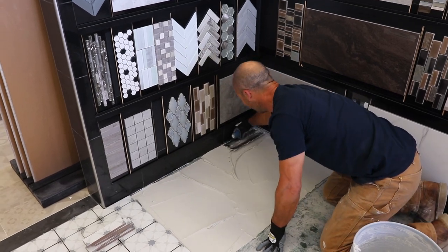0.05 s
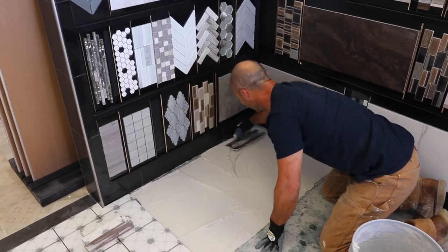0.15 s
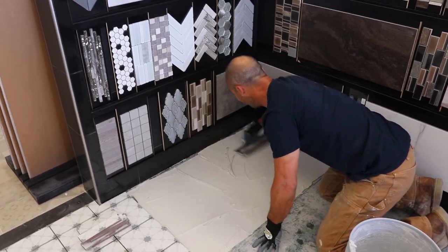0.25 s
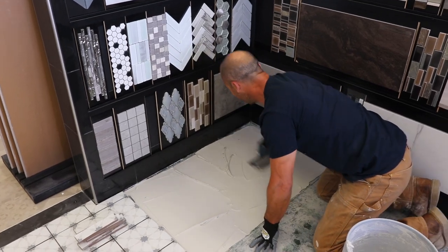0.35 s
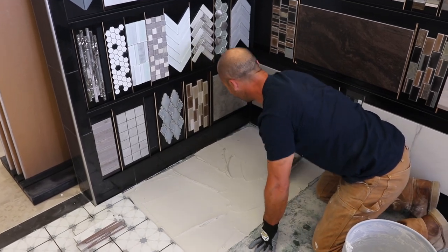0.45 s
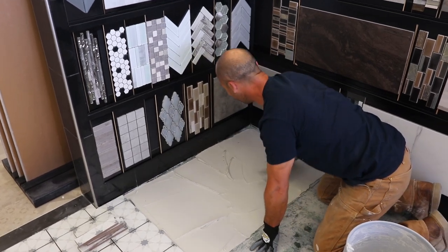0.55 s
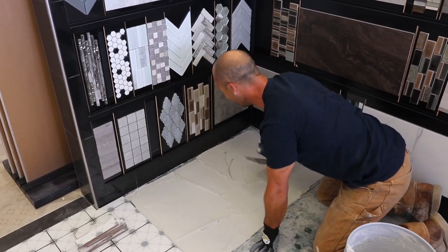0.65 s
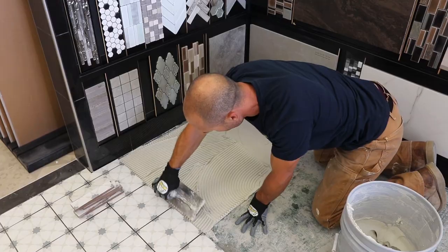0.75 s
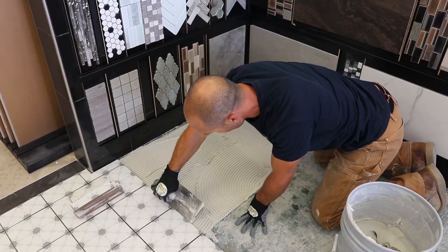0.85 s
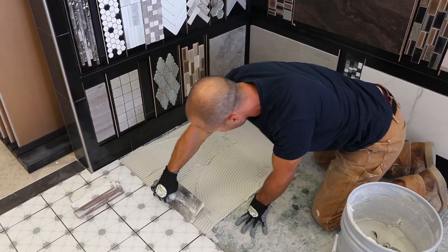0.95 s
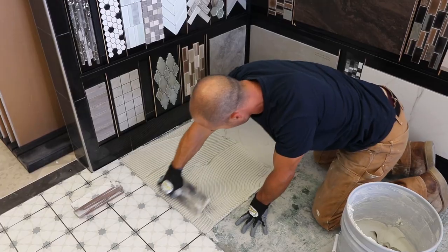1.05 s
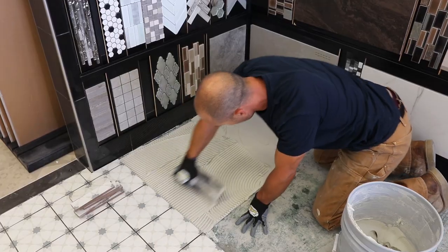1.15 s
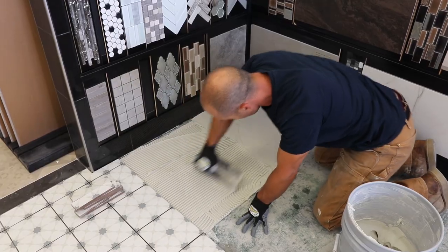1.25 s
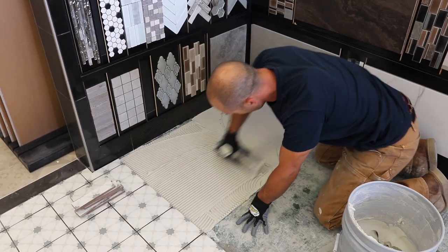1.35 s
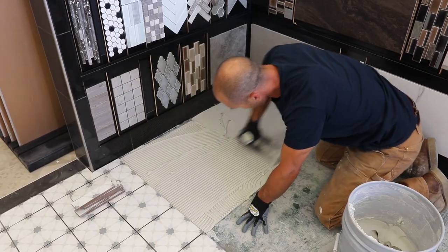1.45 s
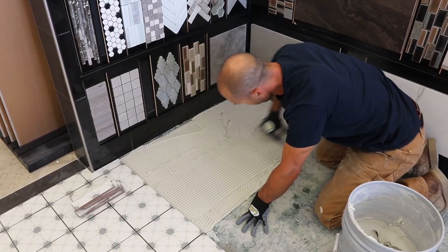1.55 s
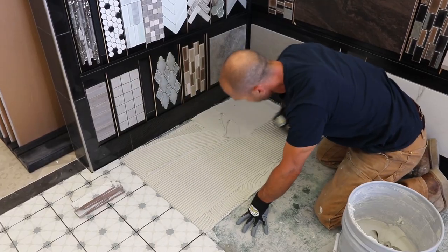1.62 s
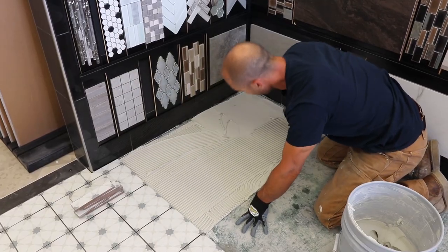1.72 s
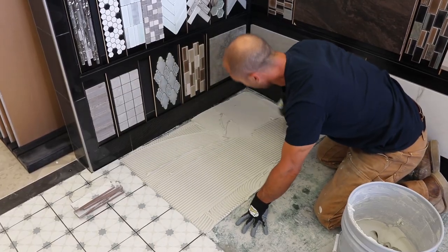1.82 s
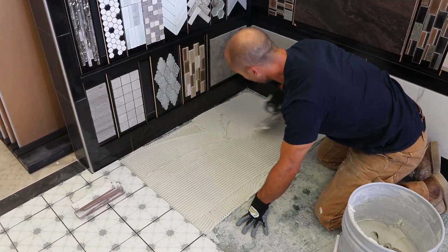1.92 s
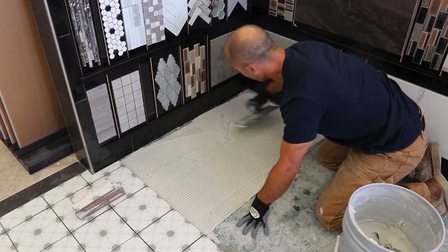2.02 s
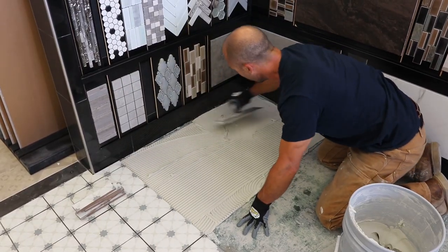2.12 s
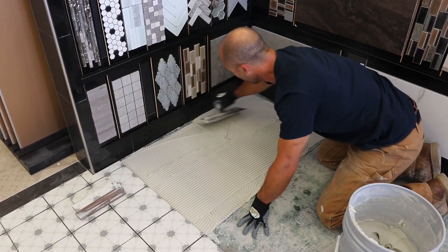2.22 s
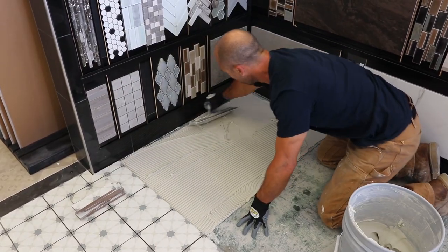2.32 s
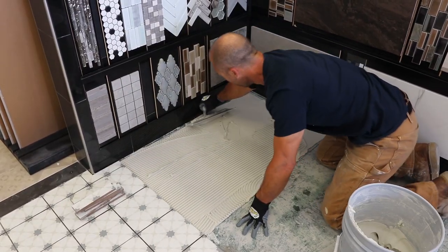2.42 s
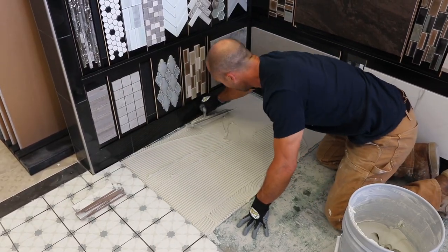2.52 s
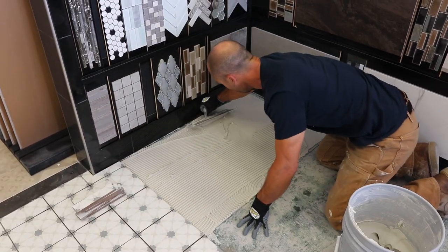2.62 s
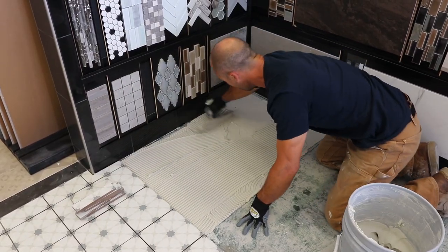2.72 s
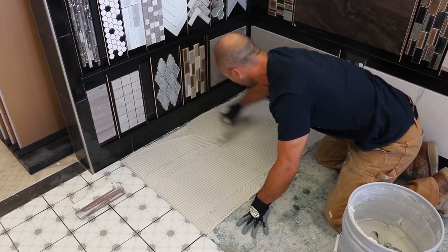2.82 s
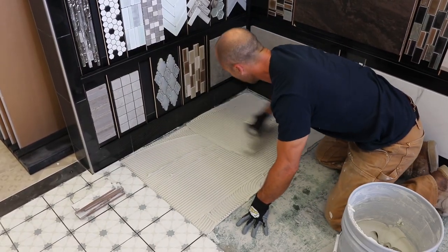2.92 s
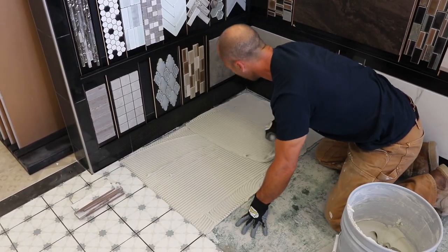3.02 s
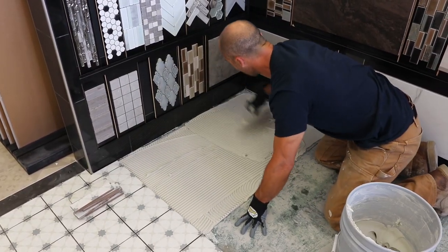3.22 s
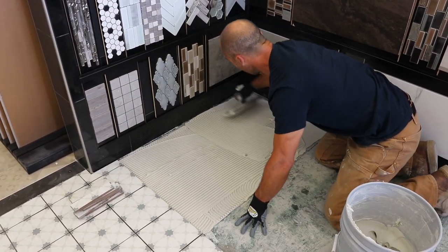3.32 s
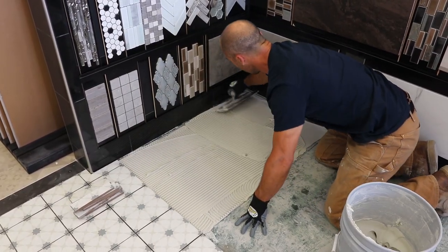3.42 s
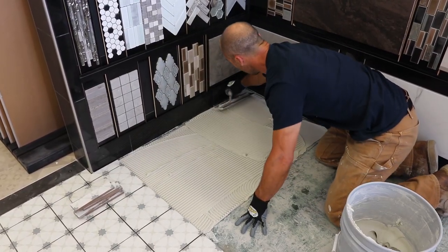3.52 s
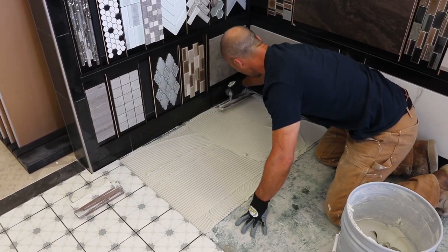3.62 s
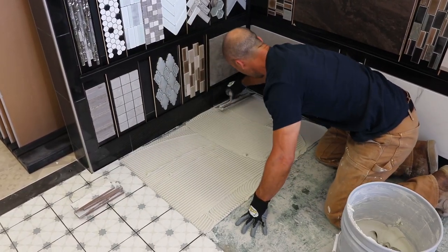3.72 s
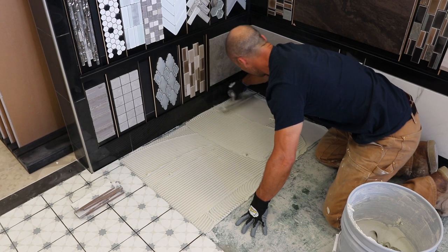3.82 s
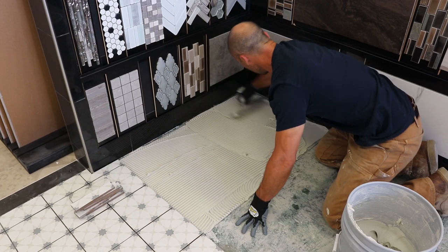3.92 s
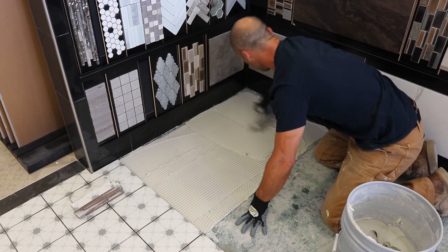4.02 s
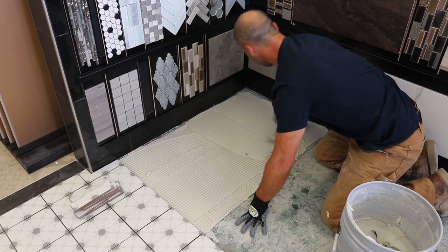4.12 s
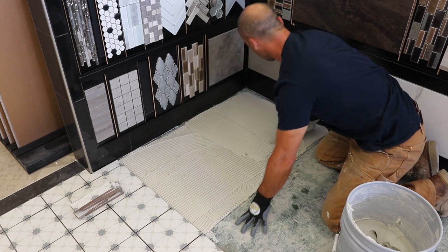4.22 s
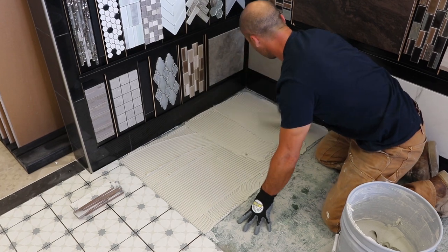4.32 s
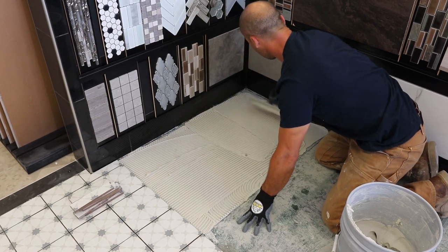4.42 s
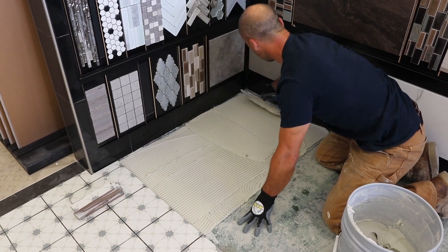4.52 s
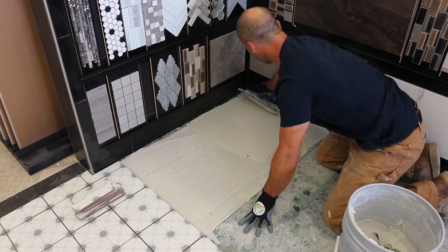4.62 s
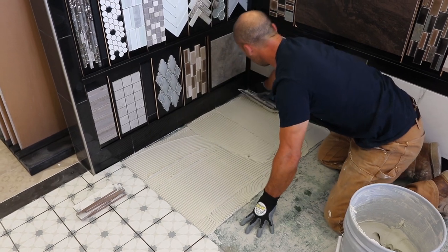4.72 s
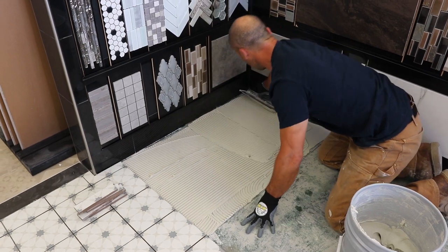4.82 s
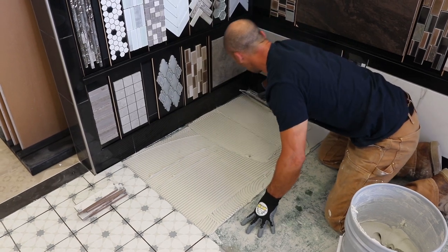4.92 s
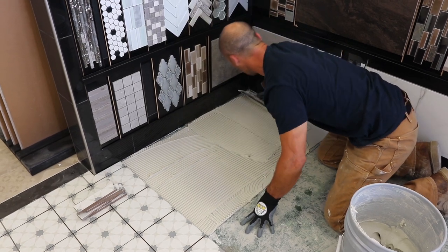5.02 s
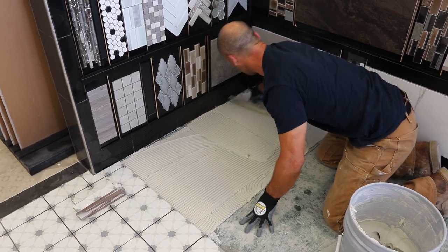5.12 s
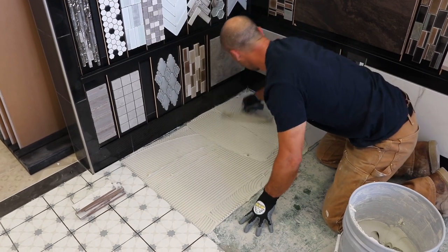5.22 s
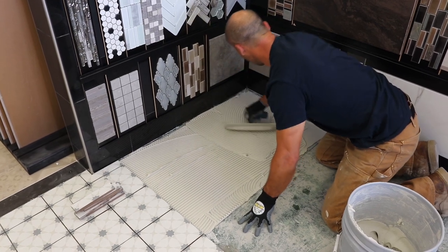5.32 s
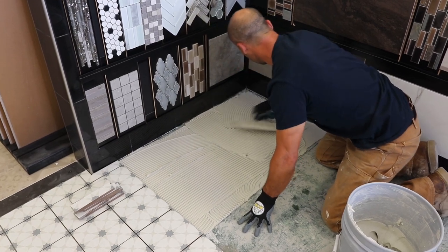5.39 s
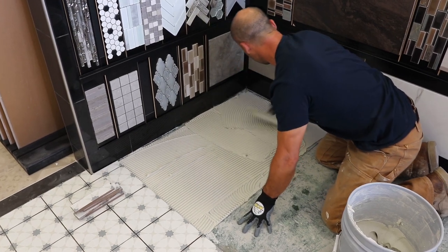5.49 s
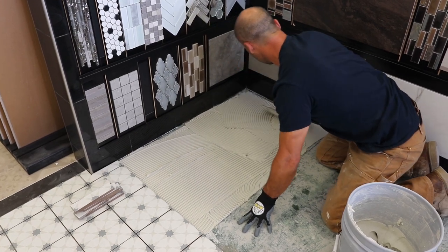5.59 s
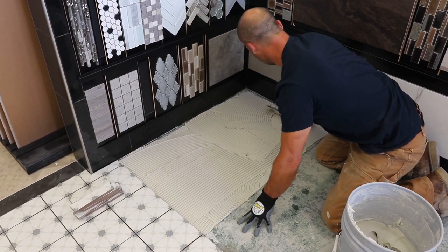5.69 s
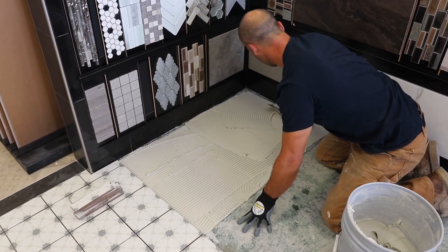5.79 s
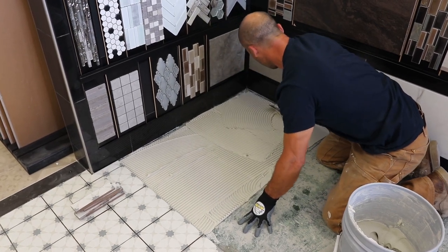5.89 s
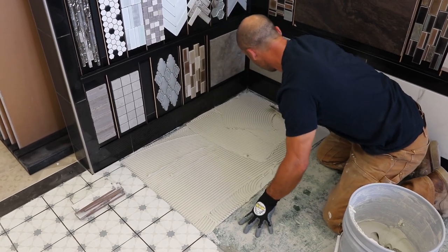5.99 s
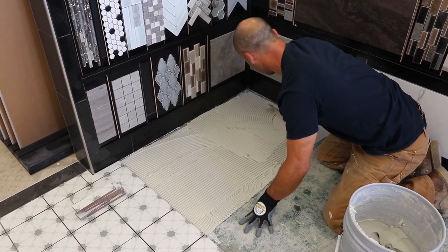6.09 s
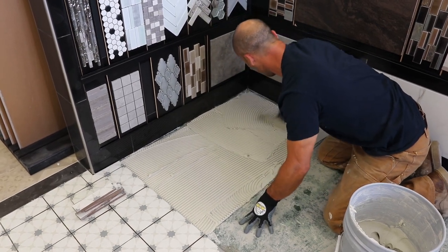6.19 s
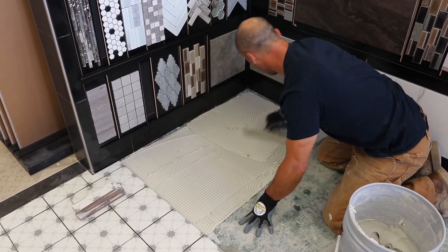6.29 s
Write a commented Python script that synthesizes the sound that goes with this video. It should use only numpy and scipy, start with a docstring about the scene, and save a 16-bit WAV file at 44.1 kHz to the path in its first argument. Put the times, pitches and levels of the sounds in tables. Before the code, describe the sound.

Close gritty scraping of a steel trowel through sandy mortar on a hard floor. A few light scuffs and a sharp knock come first, then three rapid linked strokes, a knock and thud, a pause, and more strokes in pairs, getting shorter and softer. Faint ventilation and hiss in a furnished showroom with a short tail; one microphone, centred.

```python
"""Trowel combing mortar on a floor

A steel notched trowel combs gritty mortar over a hard floor in a furnished showroom, heard by one microphone.
Sand grains are random clicks that shake the blade: its resonances ring in strokes; the light first touch and
rustles of clothing and knee sound plainer. The edge ticks as it lands (short noise bursts); knee and hand thud
on the floor (low rings that fade). A room tail, ventilation, a low rumble and hiss lie around the work."""
import sys
import numpy as np
from scipy import signal
from scipy.fft import rfft, irfft
from scipy.io import wavfile
from scipy.ndimage import uniform_filter1d

SR = 44100
rng = np.random.default_rng(int(sys.argv[2]) if len(sys.argv) > 2 else 0)


def unload_wav(signal):
    """Save mono or channel-first audio to the path in sys.argv[1] as 16-bit WAV at rate SR, clipped to [-1, 1]."""
    wavfile.write(
        sys.argv[1],
        SR,
        np.round(np.clip(np.atleast_2d(signal).T, -1, 1) * 32767).astype(np.int16),
    )


N = 280035


def amp(db):
    """Turn decibels into a gain."""
    return 10 ** (np.asarray(db) / 20)


def rms_one(x):
    """Scale a sound to an average strength (rms) of 1."""
    return x / np.sqrt(np.mean(x ** 2) + 1e-20)


def at_hz(points, hz):
    """Read a table between its points, on a log-frequency axis."""
    table_hz, values = np.transpose(points)
    return np.interp(np.log(hz), np.log(table_hz), values)


def band(x, low_hz, high_hz):
    """Keep only the sound between two frequencies (Butterworth band-pass)."""
    sos = signal.butter(3, [low_hz, high_hz], "band", fs=SR, output="sos")
    return signal.sosfilt(sos, x)


def colour(x, spectrum):
    """Filter a sound to the given spectrum, with no sound ahead of its cause (minimum phase)."""
    size = 8192
    hz = np.arange(1, size // 2 + 2) * SR / size
    cepstrum = irfft(np.log(amp(at_hz(spectrum, hz))))
    # folding the second half onto the first makes the filter minimum-phase
    cepstrum[1:size // 2] *= 2
    cepstrum[size // 2 + 1:] = 0
    response = irfft(np.exp(rfft(cepstrum)))
    return signal.fftconvolve(x, response)[:N]


def drift(rate):
    """Slow random wandering, rms 1, drawn at every 20th sample; a higher rate wanders faster."""
    r = np.exp(-40 * np.pi * rate / SR)
    noise = rng.standard_normal(N // 20 + 2002)
    slow = signal.lfilter([1], [1, -2 * r, r * r], noise)[2000:]   # skip the filter's start
    return np.interp(np.arange(N) / 20, np.arange(len(slow)), rms_one(slow))


def resonance(x, hz, width_hz):
    """Something that rings at one pitch when shaken: a two-pole resonance with gain 1 at its top."""
    r = np.exp(-np.pi * width_hz / SR)
    top = (1 - r * r) / 2
    return signal.lfilter([top, 0, -top], [1, -2 * r * np.cos(2 * np.pi * hz / SR), r * r], x)


# colour of the ventilation and microphone hiss: (frequency [Hz], level [dB per Hz])
AIR_COLOUR = [(15, -30.5), (25, -13.5), (59, 1.5), (270, -2), (354, -2), (489, -7.5), (607, -1.5),
              (1040, -8.5), (1610, -8.5), (14800, -12.5), (16000, -11.5)]
AIR_DB = -63.5
# a low rumble that dies away: (time [s], level [dB])
RUMBLE_LEVEL = [(0.0, -67.5), (0.49, -74.5), (0.8, -82), (6.35, -81)]


def background():
    """Ventilation and microphone hiss are coloured noise; the rumble is noise around 14 to 55 Hz."""
    air = amp(AIR_DB) * rms_one(colour(rng.standard_normal(N), AIR_COLOUR))
    s, db = np.transpose(RUMBLE_LEVEL)
    rumble_gain = amp(np.interp(np.arange(N) / SR, s, db))
    rumble = rumble_gain * rms_one(band(rng.standard_normal(N), 14, 55))
    return air + rumble


# how long the room takes to fade by 60 dB: (frequency [Hz], time [s])
ROOM_FADE = [(150, 0.37), (400, 0.47), (1500, 0.37), (4000, 0.37), (12000, 0.15)]
# colour of the room tail: (frequency [Hz], level [dB])
ROOM_COLOUR = [(100, 3), (330, 5.5), (700, -2.5), (3000, -0.5), (12000, -5.5)]


def room(x):
    """Many scattered echoes blur into a tail: noise that rises over a few ms, then dies band by band."""
    t, tail = np.arange(SR) / SR, 0
    edges = 40 * 2 ** np.arange(0, 9, .5)   # half-octave bands
    for low, high in zip(edges, np.append(edges[1:], 19000)):
        fade_s = at_hz(ROOM_FADE, np.sqrt(low * high))
        level_db = at_hz(ROOM_COLOUR, low) - 60 * t / fade_s
        tail = tail + band(rng.standard_normal(SR), low, high) * amp(level_db)
    tail *= 1 - np.exp(-t / 0.002)
    return signal.fftconvolve(x, tail / np.sqrt(np.sum(tail ** 2)))[:N]


# knee and hand on the floor: (time [s], level [dB], pitch [Hz], time to fade by 60 dB [s])
KNEE_AND_HAND = [(1.832, -22, 184.5, 0.085), (2.51, -28, 75.2, 0.15), (3.595, -38, 286, 0.041),
                 (3.612, -44, 125, 0.077), (4.879, -54, 116, 0.12), (6.129, -38, 133, 0.087)]


def thuds():
    """A soft push on the floor: a ring that sags in pitch, a lower partner and a rounded start."""
    out, t = np.zeros(N + SR), np.arange(SR // 2) / SR
    for s, db, hz, t60 in KNEE_AND_HAND:
        turns = hz * (t + 0.00079 * (1 - np.exp(-t / 0.0051)))   # starts sharp, settles at hz
        ring = np.sin(2 * np.pi * turns) + .5 * np.sin(2 * np.pi * 0.69 * turns)
        start = (1 - np.exp(-t * hz * 3.1)) ** 2
        out[round(s * SR):][:len(t)] += amp(db - 60 * t / t60) * start * ring
    return band(out[:N], 45, 900)


# blade edge on the floor, plus one faint rustle of clothing at 3.7 s: (time [s], knock peak [dB], scratch peak
# above the knock [dB], knock pitch [Hz])
EDGE_TICKS = [(0.308, -42, -12.5, 613), (0.325, -43.5, 1, 635), (0.441, -34, -12, 950),
              (0.48, -20.5, -37, 1410), (1.015, -43, -4, 900), (1.55, -17, -21.5, 640),
              (1.815, -24, -10, 674), (2.554, -44, -17, 810), (2.601, -37.5, -34, 818),
              (2.655, -41.5, -8, 840), (3.7, -58.5, 9, 604), (3.777, -50, 9.5, 860),
              (3.801, -37.5, 12.5, 794), (3.877, -25, 0, 535), (4.904, -39.5, -20, 516),
              (4.943, -48.5, 0.5, 547), (4.992, -43, 4, 684), (5.005, -47, 13, 1160), (5.03, -42.5, 8, 860),
              (5.058, -49, 10, 980), (5.087, -34.5, 14.5, 1080), (5.305, -39.5, 4, 862),
              (5.948, -50, 4.5, 448), (6.005, -58, 10.5, 800), (6.081, -28.5, -10, 880),
              (6.099, -29.5, 8, 930), (6.135, -31, -4, 640)]
# bright part of a tick: (frequency [Hz], level [dB per Hz])
SCRATCH_COLOUR = [(1500, -39), (3000, -2), (4500, 2.5), (6300, 0), (9000, -10.5), (13000, -4),
                  (16000, -12.5)]
TICK_S = .0032   # fade time constant


def ticks():
    """Each landing of the edge, and the faint rustle at 3.7 s, is a noise burst: a damped knock at its own
    pitch and a bright scratch."""
    out, t = np.zeros(N + SR), np.arange(SR // 20) / SR
    knocks = rng.standard_normal((len(EDGE_TICKS), len(t)))
    scratch = colour(rng.standard_normal(N), SCRATCH_COLOUR)
    fade = np.exp(-t / TICK_S) * (1 - np.exp(-4 * t / TICK_S))
    for k, (s, db, scratch_db, hz) in enumerate(EDGE_TICKS):
        dull = resonance(resonance(knocks[k] * fade, hz, 0.17 * hz), hz, 1.3 * hz)
        bright = scratch[k * len(t):][:len(t)] * fade
        tick = dull / np.abs(dull).max() + amp(scratch_db) * bright / np.abs(bright).max()
        out[round(s * SR):][:len(t)] += amp(db) * tick
    return out[:N]


GRAINS_PER_S = 7000   # under a full press
GRAIN_SPREAD_DB, JUDDER_DB = 1, 0.5
FULL_PRESS_DB = -35   # below this level fewer grains catch


def grains(tables):
    """Sand grains catch as clicks of uneven size, sparse under a light touch; the contact sticks and slips."""
    s, press_db = np.vstack(tables)[:, :2].T
    share = np.clip(amp(np.interp(np.arange(N) / SR, s, press_db) - FULL_PRESS_DB), .3, 1)
    sizes = amp(GRAIN_SPREAD_DB * np.minimum(rng.exponential(1, N), 5))
    clicks = sizes * rng.choice([-1, 1], N) / np.sqrt(share)   # fewer clicks are made larger
    caught = rng.random(N) < share * GRAINS_PER_S / SR
    judder = amp(JUDDER_DB * (drift(34) + drift(150)))
    return clicks * caught * judder


# blade resonances: (pitch [Hz], width [Hz], level before the shared trim and flexing [dB])
BLADE_RINGS = [(367, 73, -4.5), (510, 76, -1.5), (640, 170, -1), (857, 77, 1), (1070, 420, -3.5),
               (1240, 81, -9.5), (1413, 210, -3), (1684, 140, -0.5), (1885, 260, -2), (3220, 440, -13.5),
               (4330, 1100, -7), (6140, 880, -5), (7700, 270, -8)]
# colour of the scrape: (frequency [Hz], level [dB per Hz])
SCRAPE_COLOUR = [(80, -59), (170, -14.5), (380, -14), (600, -5.5), (1100, -10), (1750, -6), (2350, -14),
                 (4200, -9), (7500, -14), (10500, -15.5), (13000, -11), (15700, -18)]
BLADE_RING_DB, FLEX_DB = -0.5, 6   # shared trim, rms swing of the flexing


def blade(x):
    """The steel plate adds its rings to whatever shakes it; they swell and fade as it flexes under the hand."""
    rings = 0
    for hz, width_hz, db in BLADE_RINGS:
        flexing = amp(db + BLADE_RING_DB + FLEX_DB * drift(6))
        rings = rings + flexing * resonance(x, hz, width_hz)
    return colour(x + rings, SCRAPE_COLOUR)


# edges between drag, belly, edge, grit and fine sand: frequency [Hz]
PART_EDGES = [60, 420, 1100, 2600, 8000, 17000]
END_FADE_DB_PER_S = 899.5   # fade after the end of each piece of a stroke or scuff
PATCHY_DB, DRAG_LUMPS_DB = 1.34, 1.5   # rms swing of every part, extra swing of the drag


def play(shaken, tables, parts, leans):
    """Level and treble of each piece set how hard each part speaks; the balance shifts along the piece."""
    t, gains = np.arange(N) / SR, np.zeros((5, N))
    for rows, (drag, drag_gained, edge, fine) in zip(tables, leans):
        s, level_db, treble_db = np.transpose(rows)
        along = (s - s[0]) / (s[-1] - s[0]) - .5   # -0.5 at the start, 0.5 at the end
        end_fade_db = END_FADE_DB_PER_S * np.maximum(t - s[-1], 0)
        part_leans = [drag + drag_gained * along, 0, edge, 0, fine]
        for k, ((db, follows, gained_db), lean_db) in enumerate(zip(parts, part_leans)):
            part_db = level_db + db + lean_db + follows * treble_db + gained_db * along
            gains[k] += amp(np.interp(t, s, part_db, left=-200) - end_fade_db)
    gains = uniform_filter1d(gains, size=150, axis=1)
    gains *= [amp(PATCHY_DB * drift(36)) for part in gains]   # the parts flutter apart
    gains[0] *= amp(DRAG_LUMPS_DB * drift(30))   # the low drag comes in lumps
    return sum(g * rms_one(band(shaken, low, high))
               for g, low, high in zip(gains, PART_EDGES, PART_EDGES[1:]))


# successive pieces of the combing passes, then the light first touch and rustles of clothing and knee between
# the passes: (time [s], level of the blade body [dB], treble above it [dB])
STROKE_PATHS = [
    [(0.972, -56.5, -6.5), (1.066, -38.5, -2), (1.196, -35.5, -5), (1.208, -40.5, 3.5),
     (1.226, -24.5, -8.5), (1.24, -33, -4.5)],
    [(1.24, -32, -5), (1.28, -24.5, -2.5), (1.316, -21, -3), (1.322, -20, -4.5), (1.464, -30, -3.5),
     (1.498, -20, -5), (1.543, -39, -6)],
    [(1.543, -34, -3), (1.551, -19.5, -6.5), (1.563, -22, -1), (1.721, -20.5, -4), (1.753, -30.5, -8.5),
     (1.81, -38.5, -10.5)],
    [(2.675, -53.5, -0.5), (2.733, -27, -4), (2.797, -34.5, -6), (2.851, -23.5, -3.5), (2.885, -33.5, -5),
     (2.89, -24.5, -10)],
    [(2.89, -34, -0.5), (2.93, -19, -2.5), (2.974, -23, -0.5), (3.078, -18.5, -4), (3.086, -16.5, -11),
     (3.12, -36.5, -4), (3.14, -37, -7.5)],
    [(3.797, -49, 10.5), (3.803, -45, -3), (3.831, -44, 6), (3.887, -31.5, 2), (3.977, -25, -4),
     (4.073, -47.5, -3), (4.104, -40.5, 0.5)],
    [(4.104, -38, -0.5), (4.118, -26, -4), (4.166, -22.5, -3), (4.236, -26, -3), (4.274, -39.5, -11),
     (4.372, -52.5, 0), (4.4, -60.5, -9)],
    [(4.94, -55, -11), (4.944, -53, -14), (4.984, -57.5, -3.5), (4.992, -51, -0.5), (5.026, -54, -3),
     (5.03, -51, 3), (5.068, -74, 5.5)],
    [(5.068, -55, 8.5), (5.082, -44.5, 1.5), (5.116, -34.5, 1.5), (5.164, -32, -7.5), (5.248, -46, -9),
     (5.296, -49, -0.5), (5.303, -45, -5)],
    [(5.303, -45.5, -0.5), (5.307, -39.5, -1), (5.341, -22.5, -2.5), (5.369, -23, -4.5), (5.42, -38, -12.5)],
    [(5.945, -59.5, 1), (5.953, -59, 1.5), (5.973, -59, 7), (5.991, -57, -6), (6.019, -68, 12),
     (6.075, -56, 2), (6.078, -57, -1)],
    [(6.078, -39, 1), (6.084, -36, -10), (6.09, -44.5, -2), (6.134, -35.5, 4), (6.208, -25.5, -7),
     (6.316, -46, -7.5), (6.35, -32.5, -2.5)],
]
SCUFF_PATHS = [
    [(0.2, -73.5, 0.5), (0.296, -57.5, -5.5), (0.312, -47.5, -7), (0.334, -53, -4), (0.398, -49, -7),
     (0.43, -43, -12)],
    [(0.43, -43.5, -22), (0.446, -43, -17), (0.468, -46, -2.5), (0.484, -33, -5), (0.498, -37.5, -1.5),
     (0.56, -51, -12)],
    [(2.325, -67, 1), (2.337, -45, -13.5), (2.383, -49.5, -10.5), (2.477, -44, -9.5), (2.669, -42.5, -16.5),
     (2.675, -64, -6)],
    [(3.47, -74, -10), (3.486, -67.5, 1), (3.548, -78, -1), (3.594, -66, 4), (3.656, -76, -6.5),
     (3.72, -72.5, 3)],
]
# one row each for drag, belly, edge, grit and fine sand:
# (level [dB], share of the treble it follows [ratio], gained from start to end of a piece [dB])
STROKE_BALANCE = [(-10, 0.19, 2.5), (-2, -0.11, -2), (-3.5, 0.18, -1.5), (-1.5, 1, -3.5), (-7, 1.29, -4)]
SCUFF_BALANCE = [(-15.5, 1.1, -7), (-5.5, 0.3, -3), (0, 1.06, 3), (-1, 1.35, -3), (-4.5, 1.94, 1)]
# lean of the blade, one row per piece of a stroke or scuff, shifts three parts:
# (drag [dB], drag gained along the piece [dB], edge [dB], fine sand [dB])
STROKE_TILT = [(-2.5, 4.5, 2, -1), (-2.5, -7, 1, 0), (-2.5, 9, 2.5, 2), (-0.5, -5, -2, 1),
               (-4, -3.5, 1, 1.5), (1.5, -6.5, -1, 1.5), (-4, 2.5, 2, 3.5), (-4, -9, -6, 10.5),
               (8, -2, -3, 1.5), (-1.5, -11, 0, -1), (-8, -8, 0.5, -4.5), (1, 1, -0.5, 3)]
SCUFF_TILT = [(6.5, -9, -2.5, 1), (-23, 0, 7.5, -4), (16, -3.5, -2, -7), (-10, 0, -1.5, -6)]
# colour of the scuffs: (frequency [Hz], level [dB per Hz])
SCUFF_COLOUR = [(90, -37), (220, -2), (450, -10.5), (750, 7.5), (1150, -15.5), (1600, -6), (2700, -10.5),
                (4000, -11.5), (7000, -23), (15000, -16)]


def scrape():
    """Grains ring the blade in pressed strokes; the light first touch and the rustles of clothing and knee only
    get a plainer colour."""
    ringing = blade(grains(STROKE_PATHS))
    strokes = play(ringing, STROKE_PATHS, STROKE_BALANCE, STROKE_TILT)
    plain = colour(grains(SCUFF_PATHS), SCUFF_COLOUR)
    scuffs = play(plain, SCUFF_PATHS, SCUFF_BALANCE, SCUFF_TILT)
    return strokes + scuffs


def scene():
    """Work on the floor, its room tail and the background, the same in both channels."""
    work = scrape() + ticks() + thuds()
    room_tail = amp(-14) * room(work)
    mid = work + room_tail + background()
    return np.array([mid, mid])


# colour of the amplifier hiss: (frequency [Hz], level [dB per Hz])
HISS_COLOUR = [(15, -27), (25, -1.5), (161, 1), (236, -2), (7510, -5.5), (16000, -1)]
HISS_DB, CUTOFF_HZ = -67.5, 16250


def record(dry):
    """One microphone on both channels; amplifier hiss enters them with opposite sign; the top is cut."""
    hiss = amp(HISS_DB) * rms_one(colour(rng.standard_normal(N), HISS_COLOUR))
    top_cut = signal.cheby2(18, 70, CUTOFF_HZ, fs=SR, output="sos")
    return signal.sosfilt(top_cut, dry + hiss * [[1], [-1]])


dry = scene()
out = record(dry)
unload_wav(out)
```